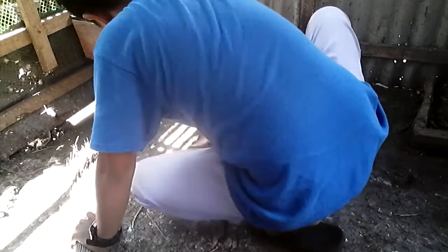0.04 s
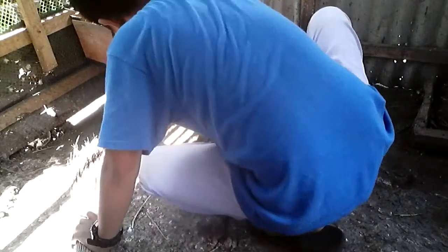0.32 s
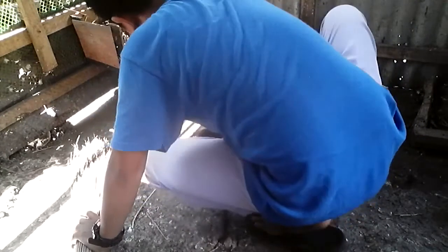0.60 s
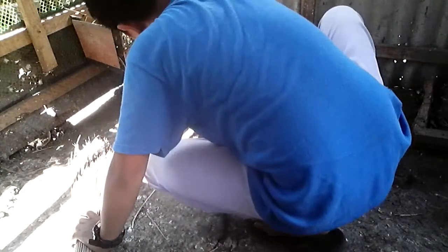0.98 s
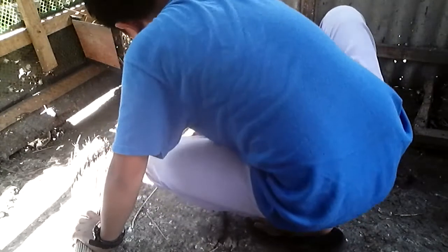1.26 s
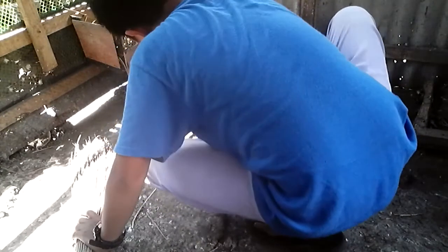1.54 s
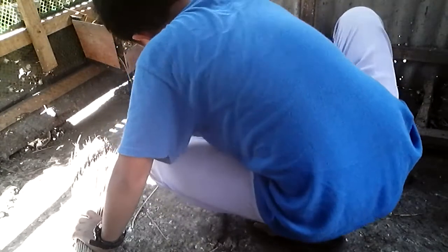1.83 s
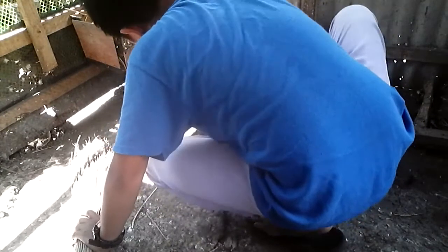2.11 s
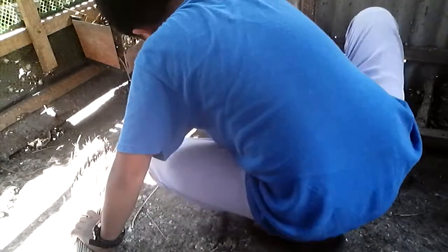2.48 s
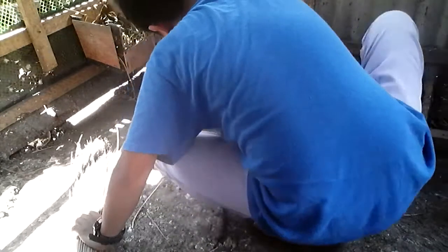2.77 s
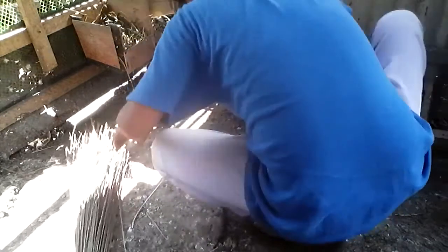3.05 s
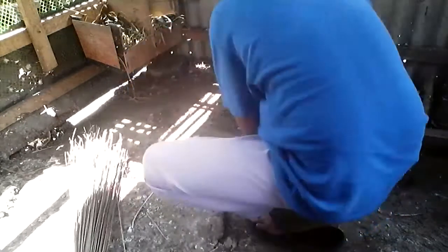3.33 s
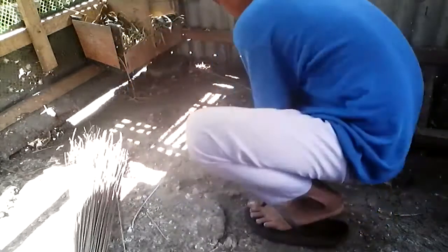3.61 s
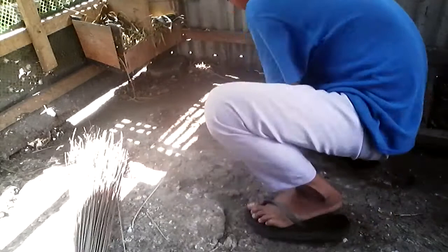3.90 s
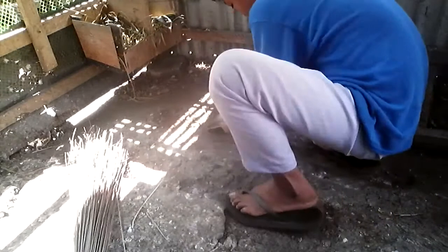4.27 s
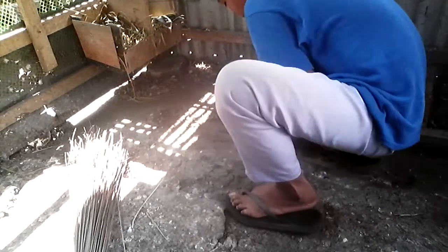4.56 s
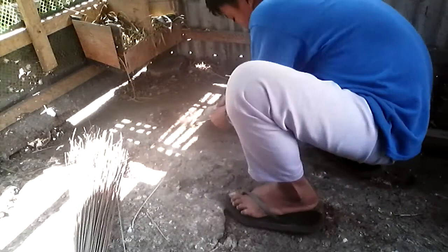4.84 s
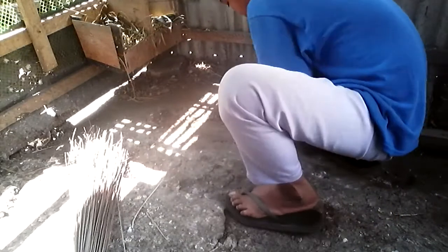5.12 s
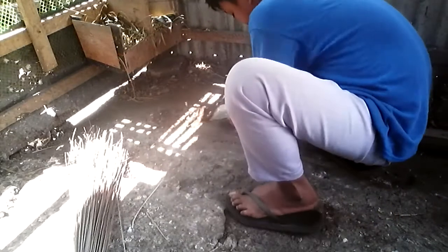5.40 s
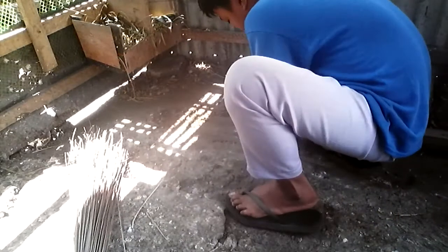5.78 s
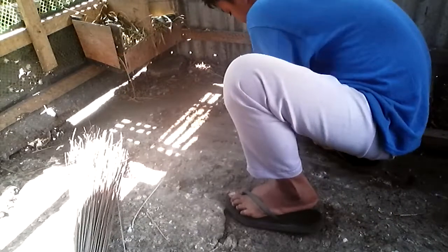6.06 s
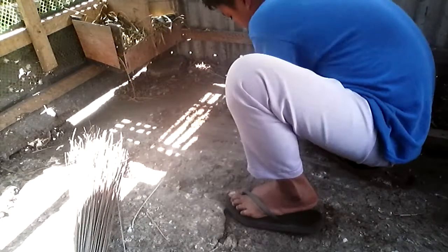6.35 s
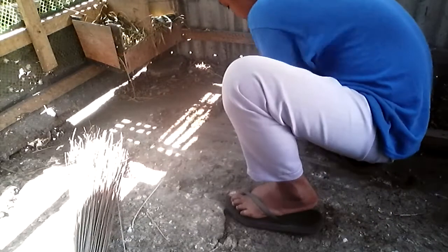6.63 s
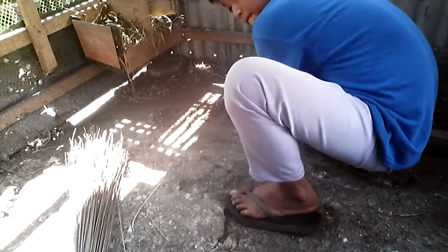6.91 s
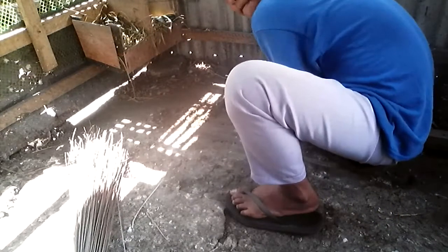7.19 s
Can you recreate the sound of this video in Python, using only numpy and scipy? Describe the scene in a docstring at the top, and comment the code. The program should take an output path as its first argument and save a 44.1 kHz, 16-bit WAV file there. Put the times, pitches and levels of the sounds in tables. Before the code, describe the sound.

A stiff hand tool, probably a blade, scrapes dried dirt off a concrete floor close by in an outdoor bird loft. The strokes are short and gritty, sticking and slipping with a slight ring, and often begin with a clack. The first run is uneven, with stronger scrapes at about 0.5 and 1.8 seconds and small hollow knocks around 1 and 2.4 seconds. From 2.7 to 3.5 seconds the scraping pauses for a couple of taps and a soft rustle of clothes and broom sticks. At 3.7 seconds it resumes with a fuller, different ring, one stroke roughly every half second, with a sharp catch at 5.9 and a last strong scrape near 7. Throughout, small birds chirp, peep and twitter faintly over a quiet outdoor rumble and hiss. A far bird coos softly and briefly at about 5 and 7.2 seconds.

```python
"""Over outdoor air, someone squatting in a bird loft scrapes dried dirt off a concrete floor with a stiff
hand tool, probably a blade, while birds chirp, peep and twitter faintly. The edge lands with a clack,
then sticks and slips, cracking grit that rings the tool in a rasp. About three seconds in he turns, with
a rustle of clothes and broom sticks, and works on a new patch with a different ring.
In the last seconds a far bird coos softly, twice."""
import sys
import numpy as np
from scipy import signal
from scipy.fft import rfft, irfft
from scipy.io import wavfile
from scipy.ndimage import uniform_filter1d

SR = 44100
rng = np.random.default_rng(int(sys.argv[2]) if len(sys.argv) > 2 else 0)


def store_wav(level_fs):
    """Save 16-bit WAV to argv[1]."""
    pcm = np.round(np.clip(np.atleast_2d(level_fs), -1, 1) * 32767)
    wavfile.write(sys.argv[1], SR, pcm.T.astype(np.int16))


N = 321048
TIME, BINS_HZ = np.arange(N) / SR, np.fft.rfftfreq(8192, 1 / SR)

# level of the faint high background hiss, swelling and dipping: time_s, level_db (before trim)
HISS_CURVE = [(.3, -59.5), (1.25, -61.5), (1.6, -60), (2.28, -66.5), (3.5, -57), (4.08, -61), (5.15, -59.5),
              (5.65, -65.5), (6.7, -58)]


def amp(db):
    """Decibels to gain."""
    return 10 ** (np.asarray(db) / 20)


def unit_rms(x):
    """Scales to rms 1."""
    return x / np.sqrt(np.mean(x ** 2) + 1e-20)


def curve_at(points, hz=BINS_HZ):
    """Reads a curve on a log-frequency axis."""
    freq_hz, value = np.transpose(points)
    return np.interp(np.log(hz + 1), np.log(freq_hz + 1), value)


def add(mix, start_s, sound):
    """Mixes a sound in at start_s."""
    part = mix[max(round(start_s * SR), 0):][:len(sound)]
    part += sound[:len(part)]


def lowpass(edge_hz, hz=BINS_HZ, order=8):
    """Low-pass gain; 1 minus it is the high-pass."""
    return 1 / (1 + (hz / edge_hz) ** order)


def wander(rate_hz):
    """Smooth random motion of rms 1, up to about rate_hz."""
    slow = lowpass(rate_hz, np.fft.rfftfreq(N, 1 / SR), order=4)
    return unit_rms(irfft(rfft(rng.standard_normal(N)) * slow, N))


def coloured(x, gain):
    """Sends x through a minimum-phase filter of energy 1, shaped like gain over BINS_HZ."""
    log_gain = np.log(np.maximum(gain / gain.max(), 1e-5))
    mirrored = np.r_[log_gain, log_gain[-2:0:-1]]
    ring = np.fft.ifft(np.exp(signal.hilbert(mirrored).conj())).real[:len(gain)]
    return signal.oaconvolve(x, ring / np.linalg.norm(ring))[:len(x)]


def grains(per_s, hiss, spread_db=2.0):
    """Random clicks of unequal size over fine powder noise."""
    size = amp(spread_db * np.minimum(rng.exponential(1, N), 4)) * rng.choice([-1, 1], N)
    clicks = unit_rms(size * (rng.random(N) < per_s / SR))
    return unit_rms(clicks + hiss * rng.standard_normal(N))


def air(rumble_db=-72, drone_db=-73, hiss_trim_db=-3, flutter_db=1.5):
    """Outdoor bed: rumble, low drone and a drifting high hiss, each a lightly fluttering noise band."""
    # colour of the outdoor air: freq_hz, gain_db
    air_colour = [(15, -40), (25, -17.5), (50, -5), (85, 10.5), (130, 1), (378, -17), (433, -12),
                  (684, -14), (848, -15.5), (1170, -17), (1450, -16), (2060, -10), (4150, -2), (5140, -2),
                  (6050, -5.5), (7910, -26), (15500, -40.5)]
    colour, deep, dark = amp(curve_at(air_colour)), lowpass(200), lowpass(2000)
    hiss_db = np.interp(TIME, *np.transpose(HISS_CURVE)) + hiss_trim_db
    layers = [(rumble_db, deep), (drone_db, dark - deep), (hiss_db, 1 - dark)]
    return sum(coloured(amp(db + flutter_db * wander(47)) * rng.standard_normal(N), colour * band)
               for db, band in layers)


def tool_bands(colour, modes, ring_db):
    """The tool's resonances over a broad colour, split into floor drum, edge grind and blade rasp."""
    rings = sum(amp(db + ring_db) ** 2 / (1 + ((BINS_HZ - hz) / width) ** 2) ** 2
                for hz, width, db in modes)
    gain = np.sqrt(amp(curve_at(colour)) ** 2 + rings)
    low, high = lowpass(700), 1 - lowpass(2800)
    return gain * low, gain * (1 - low) * (1 - high), gain * high


def pressure(press_s, hold_s, touch_db, full_db, end_db, grind_db, drum_db, lift_db_per_s):
    """One stroke's drive to drum, grind and rasp: it grows as the hand bears down, dies as it lifts."""
    swell_db_per_s, release_s = 229.5, 0.18
    lift_s = press_s + hold_s
    t = np.arange(0, lift_s + release_s, 1 / SR)
    phases_s = [0, press_s, lift_s]
    swell = np.maximum(touch_db, full_db - swell_db_per_s * (press_s - t))
    held = np.interp(t, phases_s[1:], [full_db, end_db]) - lift_db_per_s * np.maximum(t - lift_s, 0)
    rasp = np.where(t < press_s, swell, held)
    drum = drum_db + np.interp(t, phases_s, [2, 2, -6.5])  # strongest while the edge is still slow
    grind = grind_db + np.interp(t, phases_s, [-8.5, 0, -4])  # strongest as the edge digs in
    return amp([rasp + drum, rasp + grind, rasp])


def catches(stall_share=0.36, stall_s=0.022, surge_s=0.013):
    """Gain of each band as the edge stalls on a lump, then breaks free with a fading surge."""
    # lumps in the dirt: slip_s, surge_db (before each band takes its share)
    lumps = [(0.054, 3), (0.542, 7), (0.583, 4.5), (0.601, 1.5), (1.892, 6), (1.936, 6), (2.009, 1.5),
             (3.708, 7.5), (4.224, 5), (4.3, 7.5), (4.818, 9), (4.883, 8.5), (4.925, 2), (5.407, 4),
             (5.905, 15.5), (6.46, 4.5), (6.919, 2), (6.998, 2.5), (7.048, 10)]
    # how much of a surge reaches each band: drum_share, grind_share, rasp_share
    surge_shares = [0.23, 0.68, 0.89]
    db, t = np.zeros(N), np.arange(SR // 20) / SR
    stall = -stall_share * np.exp(-t[::-1] / stall_s)
    surge = np.exp(-(t / surge_s) ** 2)
    for slip_s, surge_db in lumps:
        add(db, slip_s - t[-1], surge_db * np.r_[stall, surge])
    return amp(np.outer(surge_shares, db))


def shifting_contact(x, flare_db):
    """The point of contact moves: bands a few hundred Hz wide flare up for some milliseconds."""
    spectra = signal.stft(x, SR, nperseg=256)[2]
    flares = uniform_filter1d(rng.standard_normal(spectra.shape), size=3, axis=0)
    flares = unit_rms(uniform_filter1d(flares, size=4, axis=1))
    return signal.istft(spectra * unit_rms(amp(flare_db * np.minimum(flares, 2))), SR)[1][:N]


def scrape(strokes, bands, lift_db_per_s, grits_per_s, chatter_db, chatter_hz, flare_db):
    """The edge sticks and slips over the dirt, cracking showers of grit that ring the tool."""
    drives = np.zeros((3, N))
    for start_s, *shape in strokes:
        for drive, push in zip(drives, pressure(*shape, lift_db_per_s)):
            add(drive, start_s, push)
    drives *= catches()
    chatter = chatter_db * np.minimum(wander(chatter_hz), 2)
    slips = unit_rms(amp(chatter + 0.27 * wander(40.2)))  # the dirt also resists unevenly
    out = np.zeros(N)
    for drive, band in zip(drives, bands):
        grit = shifting_contact(grains(grits_per_s, hiss=0.29), flare_db)
        out += coloured(drive * slips * grit, band)
    return out


def chirps_and_peeps(chirp_trim_db=-7.5, peep_trim_db=-4.5, chirp_fade_db=2, peep_arch_hz=44.3):
    """Bird calls as sine glides: quick, hoarse chirps and thin peeps of unsteady pitch."""
    # slurred chirps: start_s, length_s, first_hz, last_hz, first_db (before trim)
    chirps = [(0.158, 0.051, 4600, 3950, -52.5), (0.225, 0.025, 3190, 2750, -39.5),
              (0.217, 0.018, 6100, 5700, -59), (0.862, 0.03, 6200, 6100, -65),
              (1.218, 0.038, 6250, 6080, -47.5), (2.106, 0.045, 3300, 4970, -51),
              (2.147, 0.027, 3230, 2730, -55), (2.511, 0.077, 5550, 4190, -48.5),
              (3.59, 0.062, 4600, 5200, -49), (4.122, 0.05, 4530, 3130, -50.5),
              (5.701, 0.034, 5060, 6600, -49), (5.774, 0.088, 5380, 3900, -55.5),
              (7.071, 0.039, 3160, 2450, -43)]
    # slightly arched peeps: start_s, length_s, first_hz, last_hz, first_db, last_db (before trim)
    peeps = [(0.344, 0.06, 3490, 4040, -54.5, -55), (2.471, 0.17, 3790, 3420, -46.5, -66),
             (3.328, 0.35, 3600, 4040, -60, -43.5), (4.52, 0.3, 3630, 3860, -50, -67),
             (5.517, 0.073, 4080, 3750, -44, -56), (6.12, 0.2, 3510, 3560, -64, -62),
             (7.113, 0.22, 3700, 4020, -55, -46)]
    chirp_waver, peep_waver = .025, .012
    out, shake = np.zeros(N), wander(244) + .5 * wander(29)
    flutter = unit_rms(amp(2 * np.minimum(wander(40), 1.5)))
    calls = [(*row, row[-1] - chirp_fade_db, 0, chirp_trim_db, chirp_waver) for row in chirps]
    calls += [(*row, peep_arch_hz, peep_trim_db, peep_waver) for row in peeps]
    for start_s, length_s, first_hz, last_hz, first_db, last_db, arch_hz, trim_db, waver in calls:
        on = (TIME >= start_s) & (TIME <= start_s + length_s)
        progress = (TIME[on] - start_s) / length_s
        hz = first_hz + (last_hz - first_hz) * progress + arch_hz * np.sin(np.pi * progress)
        cycles = np.cumsum(hz * (1 + waver * shake[on])) / SR
        level = amp(trim_db + first_db + (last_db - first_db) * progress) * flutter[on]
        out[on] += np.sqrt(2) * level * signal.windows.tukey(on.sum(), .2) * np.sin(2 * np.pi * cycles)
    return out


def twitter(trim_db=-7, low_hz=3000, high_hz=6000, typical_s=0.045, glide=0.21, count=170):
    """Many small birds far away: faint random slurs that come and go with the hiss."""
    out = np.zeros(N)
    for when, height, slope, span, accent_db in rng.random((count, 5)):
        progress = np.linspace(0, 1, round(typical_s * (.5 + span) * SR))
        centre_hz = low_hz * (high_hz / low_hz) ** height
        hz = centre_hz * (1 + glide * (2 * slope - 1) * (progress - .5))
        slur = np.sin(np.pi * progress) * np.sin(2 * np.pi * np.cumsum(hz) / SR)
        add(out, when * TIME[-1], amp(accent_db) * slur)
    return amp(trim_db + np.interp(TIME, *np.transpose(HISS_CURVE))) * unit_rms(out)


def clacks(hits, bands, crush, rise_s, decay_s, drum_db, grind_db, rasp_db):
    """A blow whose click is weakest in the treble, with a short burst of crushed grit and rattling."""
    t, drives = np.arange(SR // 10) / SR, np.zeros((3, N))
    for start_s, level_db, thud_db, clink_db in hits:
        bands_db = thud_db + drum_db, grind_db, clink_db + rasp_db
        for drive, band_db, click in zip(drives, bands_db, (1, 1, .3)):
            rattle = rng.standard_normal(len(t)) * np.exp(-t / decay_s) * (1 - np.exp(-t / rise_s))
            blow = crush * rattle / np.linalg.norm(rattle) + click * (t == 0)
            add(drive, start_s, amp(level_db + band_db) * blow / np.linalg.norm(blow))
    return sum(coloured(drive, band) for drive, band in zip(drives, bands))


def rustle(clump_db=2.5):
    """Clothes and broom sticks crackle softly, in small clumps, during the turn."""
    # one swell for each movement: start_s, length_s, level_db
    movements = [(2.739, 0.22, -56.5), (2.89, 0.6, -56.5), (3.176, 0.15, -52), (3.453, 0.073, -55.5)]
    # colour of cloth and sticks: freq_hz, gain_db
    cloth_colour = [(100, -34), (700, -26), (1000, -10.5), (1400, -6.5), (3000, -4), (5500, -0.5),
                    (6500, -1), (8000, -20), (13000, -24.5), (15500, -27)]
    swells = np.zeros(N)
    for start_s, length_s, level_db in movements:
        add(swells, start_s, amp(level_db) * signal.windows.cosine(round(length_s * SR)))
    fibres = unit_rms(amp(clump_db * wander(90))) * grains(per_s=900, hiss=0.91)
    return coloured(swells * fibres, amp(curve_at(cloth_colour)))


def coos(waver=0.09, overtone_db=-2):
    """A far bird coos: soft, hollow notes of two wavering partials."""
    # the coos: start_s, length_s, pitch_hz, level_db
    notes = [(5.027, .11, 427, -60), (7.186, .12, 429, -61)]
    out, shake = np.zeros(N), wander(90)
    for start_s, length_s, pitch_hz, level_db in notes:
        on = (TIME >= start_s) & (TIME < start_s + length_s)
        phase = 2 * np.pi * np.cumsum(pitch_hz * (1 + waver * shake[on])) / SR
        tone = np.sin(phase) + amp(overtone_db) * np.sin(2 * phase)
        out[on] += amp(level_db) * signal.windows.tukey(on.sum(), .6) * tone
    return out


def loft(x, wet_db, predelay_s=.004, echoes_per_s=3000):
    """Adds short scattered echoes from the tin and plank walls, each band dying at its own speed."""
    # decay of the loft: freq_hz, t60_s
    decay_times = [(150, 0.44), (400, 0.076), (1200, 0.14), (4200, 0.11), (12000, 0.13)]
    n = SR // 2
    echoes = rng.standard_normal(n) * (rng.random(n) < echoes_per_s / SR) * (TIME[:n] > predelay_s)
    hz, t, spectra = signal.stft(echoes, SR, nperseg=256)
    tail = signal.istft(spectra * amp(-60 * t / curve_at(decay_times, hz)[:, None]), SR)[1]
    return x + amp(wet_db) * signal.oaconvolve(x, tail / np.linalg.norm(tail))[:N]


def scene(turn_s=3.2):
    """Work on two patches of floor, with the turn between them, over distant birds and air."""
    # the edge touches, presses, holds and lifts: start_s, press_s, hold_s, touch_db, full_db, end_db,
    # grind_db, drum_db (the last two relative to the rasp)
    strokes = [(0.003, 0.05, 0.046, -38, -31, -31, -2, -7), (0.412, 0.14, 0.14, -39.5, -33, -23, -6, -14),
               (0.963, 0.051, 0.0097, -43, -40, -31.5, -5, -3),
               (1.419, 0.0072, 0.027, -47, -51.5, -40.5, -6.5, -5),
               (1.746, .16, 0.12, -51, -33, -29.5, -8.5, -13.5),
               (2.349, 0.0098, .012, -39, -38, -39, -6, -6.5),
               (3.657, 0.058, 0.17, -49.5, -38.5, -32, -3, -9),
               (4.175, .13, .16, -60, -36.5, -32.5, -2, -7),
               (4.761, 0.096, 0.1, -58, -33.5, -31, -1.5, -10),
               (5.29, 0.11, 0.096, -42.5, -33.5, -32.5, -0.5, -9),
               (5.847, 0.15, .025, -46, -28, -29, 2, -10),
               (6.355, 0.11, 0.084, -55, -33.5, -35.5, -1.5, -7),
               (6.87, .088, 0.045, -43, -29, -24, 0.5, -8.5)]
    # the edge lands or strikes a lump: start_s, level_db, thud_db, clink_db (before the band gains)
    hits = [(0.412, -11, -23, -27.5), (0.541, -14.5, -13, -16), (0.584, -13.5, -36, -23),
            (0.966, -27.5, -16, -0.5), (1.033, -21.5, -10.5, -8.5), (1.101, -30.5, -14.5, -4),
            (1.154, -40, -1.5, -5), (1.196, -35, -7, -4), (1.418, -34, 3, -20), (1.752, -18, -13, -17),
            (2.351, -21, -5, -4.5), (2.78, -27, -9, -12), (2.833, -32, -15, -4), (3.654, -21.5, -14.5, -29),
            (4.175, -24.5, -24.5, 0.5), (4.225, -38, -20, 9), (4.759, -20.5, -16, -13.5),
            (4.886, -20, -34, -24), (5.291, -11.5, -25, -29), (5.305, -17, -25, -16),
            (5.84, -27, -7.5, -17), (6.361, -33, -4.5, -6.5), (6.869, -18.5, -11.5, -22.5)]
    # broad colour of the scraping on each patch: freq_hz, gain_db
    first_grit = [(41, -79), (70, -28), (227, -30), (311, -6), (511, -21.5), (1350, -13.5), (1580, -18.5),
                  (1940, -12), (3260, -16), (4280, -6), (4790, -15), (5740, -13.5), (8050, -24.5),
                  (13200, -36), (15500, -38)]
    second_grit = [(41, -48), (70, -37.5), (169, -20.5), (340, -11.5), (803, -11.5), (920, 1), (1210, 2.5),
                   (1620, -2), (2490, -3), (3410, -8), (4280, 0), (6720, -9), (8230, -18), (13200, -29),
                   (15500, -32)]
    # resonances of the tool as it is held on each patch: pitch_hz, width_hz, gain_db (before ring_db)
    first_modes = [(319, 37.5, -13), (915, 29, -14.5), (1144, 53, -18.5), (1370, 130, -18.5),
                   (1773, 49, -13.5), (2000, 18, -12), (3080, 31, -14), (3670, 55, -11.5), (4264, 43, 3),
                   (4402, 43, -1), (5230, 47, -8.5), (5650, 130, -17.5), (5840, 37, -7), (6550, 120, -20.5)]
    second_modes = [(317.5, 38, -13), (733, 6.2, -12.5), (1042, 11, -4), (1211, 44, 0.5), (1885, 10, -3),
                    (2135, 66, -6.5), (2521, 40, -7), (2920, 17, -11), (3580, 64, -10), (4270, 77, 0),
                    (5565, 167, -8.5), (6400, 89, -22)]
    # hollow knock of the first patch under a blow, which damps the blade: freq_hz, gain_db
    knock_colour = [(70, -33), (240, -19), (340, -4.5), (450, -10.5), (560, -15.5), (730, -5.5),
                    (950, -4.5), (1150, -10), (2000, -5), (2900, -15.5), (4200, -6), (6200, -15),
                    (8000, -23.5), (15500, -38)]
    first = tool_bands(first_grit, first_modes, ring_db=6.5)
    knock = tool_bands(knock_colour, first_modes, ring_db=1.5)
    second = tool_bands(second_grit, second_modes, ring_db=8.5)
    work = scrape([row for row in strokes if row[0] < turn_s], first, lift_db_per_s=537,
                  grits_per_s=4500, chatter_db=-1.4, chatter_hz=146, flare_db=3.5)
    work += scrape([row for row in strokes if row[0] > turn_s], second, lift_db_per_s=347,
                   grits_per_s=3500, chatter_db=-0.5, chatter_hz=147, flare_db=4.0)
    work += clacks([row for row in hits if row[0] < turn_s], knock, crush=3.1,
                   rise_s=0.00061, decay_s=0.014, drum_db=19.5, grind_db=6.0, rasp_db=19.5)
    work += clacks([row for row in hits if row[0] > turn_s], second, crush=2.3,
                   rise_s=0.0021, decay_s=0.0076, drum_db=23.5, grind_db=9.5, rasp_db=19)
    birds = loft(chirps_and_peeps() + twitter() + coos(), wet_db=0)
    return (loft(work + rustle(), wet_db=-8) + birds + air())[None]


def record(dry, dip_hz=8900, dip_db=-4, port_hz=13300, port_db=7, width_hz=1300, cutoff_hz=15650):
    """A small microphone, hollow in the upper treble below its port resonance; then a steep band limit."""
    dip = dip_db * np.exp(-((BINS_HZ - dip_hz) / width_hz) ** 2)
    port = port_db * np.exp(-((BINS_HZ - port_hz) / width_hz) ** 2)
    colour = amp(dip + port)
    heard = coloured(dry[0], colour) * np.sqrt(np.mean(colour ** 2))
    band_limit = signal.firwin(511, cutoff_hz, window=("kaiser", 9), fs=SR)
    return signal.oaconvolve(heard, band_limit, "same")[None]


dry = scene()
out = record(dry)
store_wav(out)
```